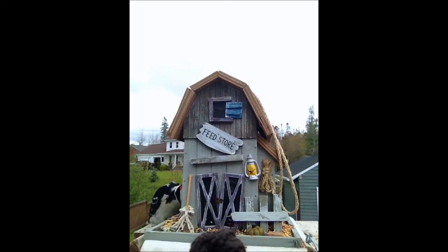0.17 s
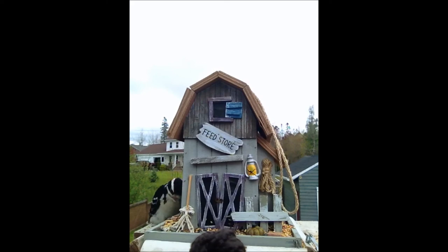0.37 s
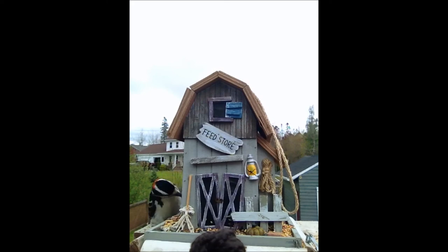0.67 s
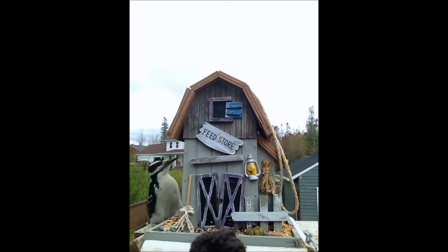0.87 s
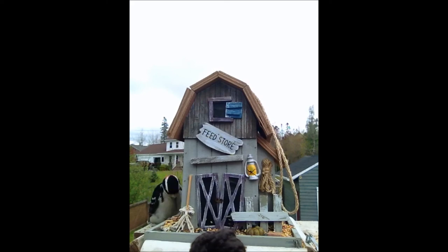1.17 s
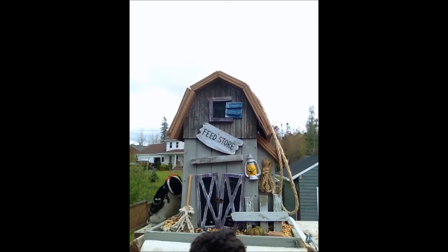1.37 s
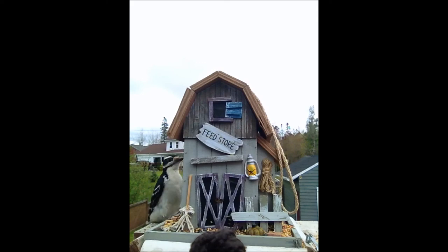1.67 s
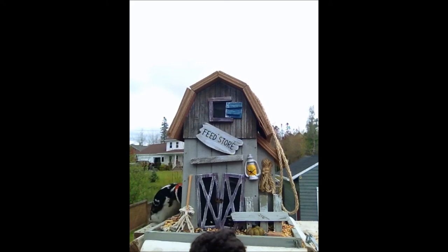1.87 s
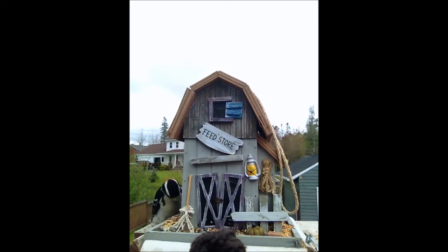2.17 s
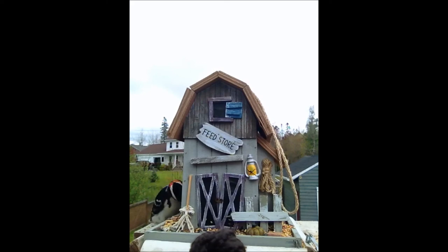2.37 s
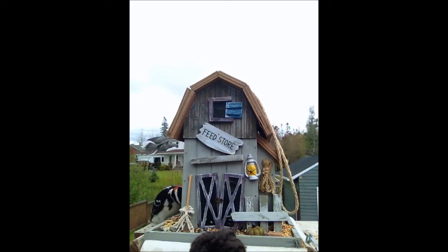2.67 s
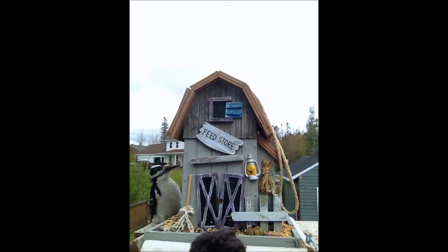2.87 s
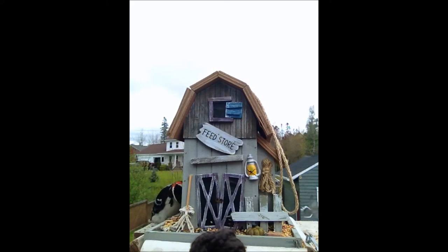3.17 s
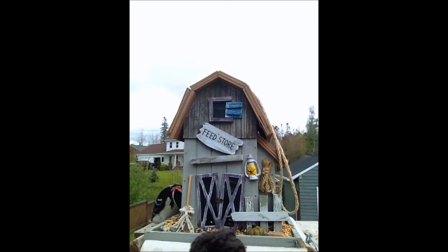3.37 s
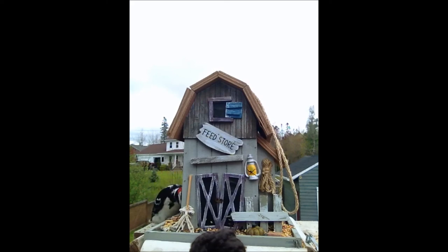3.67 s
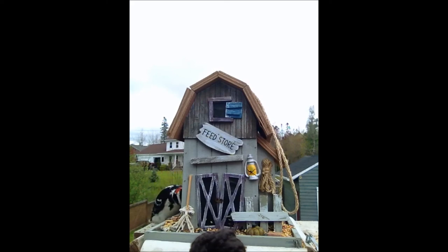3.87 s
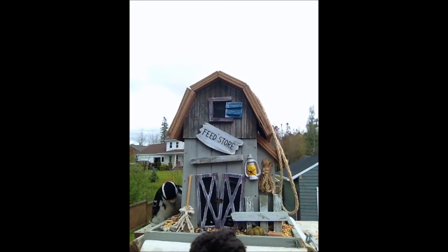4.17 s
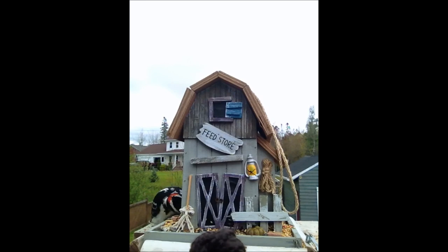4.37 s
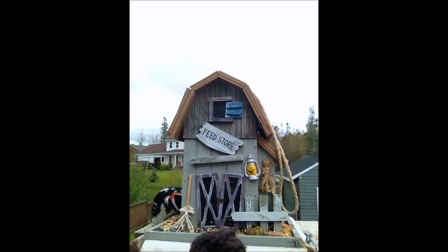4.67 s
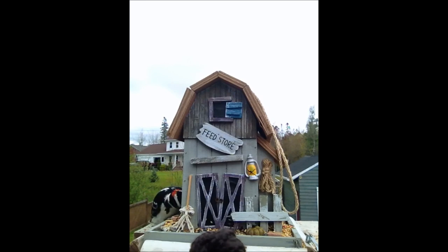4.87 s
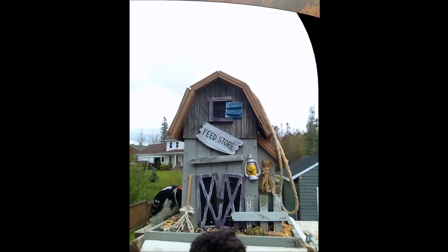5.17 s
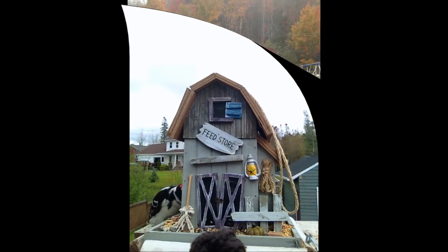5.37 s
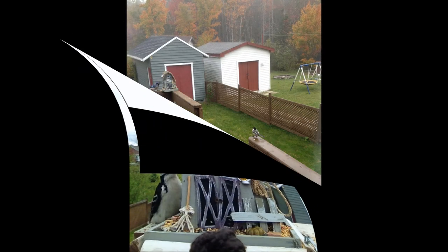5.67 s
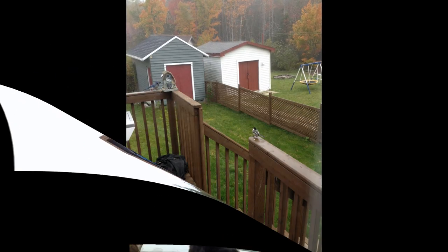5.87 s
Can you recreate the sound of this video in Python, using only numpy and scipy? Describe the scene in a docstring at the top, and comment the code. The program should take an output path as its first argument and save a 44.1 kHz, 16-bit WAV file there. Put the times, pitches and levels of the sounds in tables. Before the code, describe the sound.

Rapid whistling wingbeats recede across a backyard, followed by a few close, sharp pecks on wood and small seed cracks.

```python
"""A dove takes off from a backyard feeder and recedes, at about twelve wingbeats a second at first.
Its flight feathers flutter and whistle on the downstrokes, air swishes through them, and the wings
clap on some upstrokes. Close by, a woodpecker strikes the wooden feeder, ringing its boards, and
cracks seeds. Both birds echo off a house wall. Behind them: a wash of far traffic, open-air hiss,
the drone of a distant engine and one soft low bump."""
import sys
import numpy as np
from scipy import signal
from scipy.fft import rfft, irfft, next_fast_len
from scipy.io import wavfile

SR = 44100
rng = np.random.default_rng(int(sys.argv[2]) if len(sys.argv) > 2 else 0)


def materialize(psi):
    """Save the field psi as 16-bit PCM at rate SR to the path in sys.argv[1].

    A 1-D psi becomes a single channel; in a 2-D psi each row is a channel.
    """
    bounded = np.clip(np.atleast_2d(psi).T, -1, 1)
    quanta = np.round(bounded * 32767).astype(np.int16)
    wavfile.write(sys.argv[1], SR, quanta)


N = 266319

# Downstrokes: (time [s], length [s], level [dB], top pitch [Hz], pitch fall [share], fade [dB])
WINGBEATS = [ (.694, 0.013, -34.5, 2150, .1, 22), (.788, 0.024, -33, 2130, 0.16, 11),
             (0.875, 0.0236, -36, 2143, 0.11, -2), (0.952, 0.0251, -31.5, 2384, .09, -2),
             (1.024, 0.027, -31.5, 2297, 0.14, 1.5), (1.107, 0.036, -32.5, 2136, 0.14, 9),
             (1.253, 0.026, -48.5, 1970, 0.11, 2.5), (1.351, 0.033, -44.5, 2144, 0.19, 2),
             (1.477, 0.023, -34.5, 2192, 0.12, 5.5), (1.691, 0.025, -46.5, 2105, 0.15, -3.5),
             (1.804, .016, -39, 2056, 0.11, 1.5), (1.888, .036, -34.5, 2234, 0.13, 9),
             (1.984, 0.028, -39, 2103, 0.14, 2), (2.081, .038, -39, 2127, 0.11, 11),
             (2.18, 0.027, -39, 2000, .03, 9.5), (2.313, 0.009, -54.5, 1950, .03, -5),
             (2.427, 0.03, -45, 2226, 0.31, -5), (2.508, .036, -38, 2223, 0.127, 5.5),
             (2.621, 0.018, -44.5, 1920, .04, 12), (2.85, 0.017, -48.5, 1940, .04, 5),
             (3.063, 0.011, -56, 1940, .05, -2), (3.702, 0.013, -54, 1880, .06, 4),
             (4.205, .014, -56.5, 2010, 0.074, -8.5), (4.298, 0.02, -57, 1960, .02, -3),
             (4.425, .012, -55, 1900, .03, 1), (4.535, .028, -50, 2285, .05, 4)]
# Laboured take-off, then easy flight with spurts: (time [s], effort [0-1])
WING_EFFORT = [(.7, 0.92), (.8, 0.4), (.95, 0.4), (1.03, 0.34), (1.12, 0.2), (1.5, 0), (2.45, 0.42), (3, 0),
               (4.4, 0), (4.55, 0.4)]
# Air through feathers: (frequency [Hz], level [dB])
SWISH_SPECTRUM = [(150, -25), (700, -3.5), (1400, -21.5), (2400, -3.5), (3000, -19), (5200, -1),
                  (6500, -13.5), (7800, -24.5), (13000, -18), (16000, -27)]
def dove():
    """Each wingbeat pushes air, whistles and rustles; effort makes it rougher and airier."""
    push_spread_s, rustle_spread_s = 0.01, 0.11
    whistles, swishes = np.zeros(N), []
    for s, length_s, db, top_hz, fall, fade_db in WINGBEATS:
        effort = np.interp(s, *np.transpose(WING_EFFORT))
        add(whistles, s, feather_whistle(length_s, db, top_hz, fall, fade_db, rough=0.17 + 0.42 * effort))
        swishes.append((s, db - 24.5 + 10 * effort, push_spread_s))
        swishes.append((s, db - 32.5, rustle_spread_s))
    return whistles + puffs(swishes, SWISH_SPECTRUM) * gain_of(3.9 * wander(130))


# How loud the whistle's harmonics sound at each frequency: (frequency [Hz], level [dB])
WHISTLE_HARMONIC_LEVELS = [(1900, 2), (2300, 0), (3800, -2), (4500, 0.5), (5900, -3.5), (6500, -8.5),
                           (7200, -15), (7800, -35), (8600, -15), (9700, -31), (11000, -18), (15500, -45)]
def feather_whistle(length_s, db, top_hz, fall, fade_db, rough, size=3000):
    """A flight feather flutters during the downstroke; its pitch arches with wing speed."""
    top_at, climb_share = 0.298, 0.1235
    t = np.arange(size) / SR
    stroke = np.minimum(t / length_s, 1)
    climb = climb_share * np.clip(1 - stroke / top_at, 0, 1) ** 2
    sag = fall * np.clip((stroke - top_at) / (1 - top_at), 0, 1) ** 2
    hz = top_hz * (1 - climb - sag)
    jitter = 0.085 * rough * wander(420, size)
    turns = np.cumsum(hz * (1 + jitter)) / SR
    throb = gain_of(12 * rough * np.tanh(wander(230, size)))  # the feather catches and slips
    tone = np.zeros(size)
    for k in range(1, 8):
        harmonic_db = read(WHISTLE_HARMONIC_LEVELS, k * hz) + 5.1 * rough * wander(530, size)
        tone += gain_of(harmonic_db) * np.sin(2 * np.pi * (k * turns + rng.random()))
    gate = np.clip(t / 0.0048, 0, 1) * np.clip((length_s - t) / 0.00082, 0, 1)
    wake = np.clip(t / 0.0014, 0, 1) * np.exp(-np.maximum(t - length_s, 0) / 0.016)  # outlasts the tone
    turbulence = (0.099 + 0.38 * rough) * wake * noise(SWISH_SPECTRUM, size)
    return gain_of(db - fade_db * stroke) * (gate * evened(throb * tone) + turbulence)


# Wing contacts: (time [s], level [dB], spread [s])
WING_CLAPS = [(.842, -43, 0.0041), (.9415, -53, 0.0013), (1.0138, -23, 0.00056), (1.0955, -34.5, 0.001),
              (1.176, -48.5, .0008), (1.46, -48, 0.0021), (1.59, -55.5, 0.013), (1.97, -37.5, 0.00091),
              (2.497, -48, .0014)]
# Wing contact: (frequency [Hz], level [dB])
CLAP_SPECTRUM = [(150, -45), (700, -8), (1600, -7), (3000, -17.5), (5200, 3), (6800, -15.5), (8000, -28),
                 (11000, -17.5), (16000, -26)]
# First flap: (frequency [Hz], level [dB])
LAUNCH_SPECTRUM = [(200, -19), (900, 5), (1450, 11), (2200, -2), (3200, 5), (5200, 3.5), (7500, -13),
                   (16000, -24)]
def wing_claps(launch_s=0.639, launch_db=-40.5, launch_spread_s=0.0057):
    """The wings meet or brush on some upstrokes, after a duller first flap."""
    claps = puffs(WING_CLAPS, CLAP_SPECTRUM)
    return claps + puffs([(launch_s, launch_db, launch_spread_s)], LAUNCH_SPECTRUM)


# Beak blows: (time [s], crack [dB], resonance [Hz], rebound re crack [dB], feeder shake [dB])
BEAK_BLOWS = [(2.3871, -18.5, 4600, -33, -71), (2.514, -17.5, 4530, -15, -57),
              (2.7047, -16.5, 3590, -12.5, -32), (3.1714, -22, 3630, -43, -64),
              (3.3861, -20, 4150, -6, -37.5), (5.0125, -40.5, 2950, -16, -59), (5.088, -50, 1300, -12, -71),
              (5.1145, -42, 3970, -28, -70)]
# Low modes of the whole feeder: (frequency [Hz], level [dB], t60 [s])
FEEDER_MODES = [(157.6, -14, 0.42), (219, -2, 0.068), (262, -19, 0.53), (312, -3, 0.063), (670, 9, 0.02),
                (980, 1, 0.06)]
def woodpecker(rebound_s=0.004, boards_db=-21.5):
    """The beak lands, then lands again as the feeder gives and shakes."""
    pecks = np.zeros(N)
    for s, crack_db, hz, rebound_db, shake_db in BEAK_BLOWS:
        add(pecks, s, beak_contact(crack_db, hz, boards_db))
        rebound = beak_contact(crack_db + rebound_db, hz, boards_db + 6)
        add(pecks, s + rebound_s, rebound + gain_of(shake_db) * ring(FEEDER_MODES))
    return pecks


# Beak on wood: (frequency [Hz], level [dB])
CRACK_SPECTRUM = [(100, -65), (500, -53), (1000, 1.5), (2200, -11), (2900, -7.5), (3500, 2), (4200, -7),
                  (5000, 4.5), (5900, -2), (7000, -17), (7800, -37), (8700, -31), (9800, -39), (11300, -28),
                  (16000, -49)]
# Modes of the boards: (frequency [Hz], level [dB], t60 [s])
BOARD_MODES = [(640, -41, 0.022), (797, -9.5, 0.054), (1070, 0, 0.027), (1322, -1, 0.03),
               (1452, 2.5, 0.013), (1783, 1, 0.021), (1834, -25, 0.12), (2620, -6.5, 0.024),
               (3590, 0.5, 0.0083), (5460, -17, 0.013)]
def beak_contact(crack_db, hz, ring_db):
    """A crack over ringing boards; the ring grows less than the crack, so hard blows are brighter."""
    sound = gain_of(ring_db + 0.47 * crack_db) * ring(BOARD_MODES)
    add(sound, 0, gain_of(crack_db) * snap(CRACK_SPECTRUM, hz, lift_db=8.5, t60_s=0.015, scatter=0.9))
    return sound


# Seed snaps: (time [s], level [dB], resonance [Hz])
SEED_SNAPS = [(3.767, -49, 4500), (3.808, -48, 6100), (3.9768, -29.5, 3940), (3.993, -48, 11000),
              (4.781, -50, 12000), (4.8793, -47.5, 5700), (4.954, -48.5, 7260), (5.3428, -41.5, 2650)]
# Seed husk: (frequency [Hz], level [dB])
HUSK_SPECTRUM = [(100, -39), (800, -8), (2000, -2.5), (4000, 7.5), (5600, 6.5), (7500, -8), (12000, -10.5),
                 (16000, -13)]
def seeds():
    """The beak cracks and nudges seeds."""
    snaps = np.zeros(N)
    for s, db, hz in SEED_SNAPS:
        add(snaps, s, gain_of(db) * snap(HUSK_SPECTRUM, hz, lift_db=11.5, t60_s=0.0042, scatter=1.0))
    return snaps


# Far traffic: (frequency [Hz], density [dB])
TRAFFIC_SPECTRUM = [(18, -76), (30, -32), (76, -32), (96, -14.5), (162, 0), (225, -2), (276, 1.5),
                    (303, -3.5), (339, -1.5), (379, -5), (548, -2), (809, -1), (1070, -0.5), (1550, -5),
                    (2500, -15.5), (3250, -29.5), (5500, -120)]
# Open-air hiss: (frequency [Hz], density [dB])
HISS_SPECTRUM = [(1500, -0.5), (2300, -7), (3000, 1), (4000, -3.5), (5300, 1), (6200, -11), (7200, -24.5),
                 (9000, -23.5), (16000, -24.5)]
# Slow background swell: (time [s], level [dB])
AIR_SWELL = [(0, -0.9), (.5, -0.16), (.75, 0.3), (2.2, .1), (2.8, 1), (3.5, -.5), (4.1, -0.77), (4.9, 0.34),
             (6.04, .5)]
def open_air():
    """A low wash of far traffic and a thin hiss swell together, the hiss more deeply."""
    swell_db, = follow(AIR_SWELL)
    traffic = noise(TRAFFIC_SPECTRUM) * gain_of(-50 + swell_db + 1.2 * wander(2.5))
    hiss = noise(HISS_SPECTRUM) * gain_of(-62.5 + 3.9 * swell_db + 0.89 * wander(37))
    return traffic + hiss


# Engine run: (time [s], cycle rate [Hz], level [dB])
ENGINE_RUN = [(0, 25.8, -66.5), (.65, 28.36, -59), (1.55, 28.8, -63), (1.85, 31.03, -58.5),
              (2.5, 31.3, -63), (2.8, 28.3, -63.5), (3.1, 26.18, -75), (4.0, 27.78, -77),
              (4.8, 28.4, -67.5), (6.04, 27.4, -65)]
# Exhaust resonances: (frequency [Hz], gain [dB])
EXHAUST_RESPONSE = [(75, -9), (86, -15), (92, -3), (103, -10.5), (115, -1), (124, -9), (192, -2.5),
                    (200, 2.5), (215, -6.5)]
def engine():
    """Three wavering orders of a far engine, each louder when it meets an exhaust resonance."""
    cycle_hz, db = follow(ENGINE_RUN)
    turns = np.cumsum(cycle_hz * (1 + 0.0053 * wander(45))) / SR
    drone = np.zeros(N)
    for order in (3, 4, 7):
        order_db = db + read(EXHAUST_RESPONSE, order * cycle_hz) + 0.41 * order * wander(23)
        drone += np.sqrt(2) * gain_of(order_db) * np.sin(2 * np.pi * order * turns)
    return drone


# Low bump: (frequency [Hz], level [dB])
BUMP_SPECTRUM = [(50, -38), (85, 0), (125, -3), (165, 0), (220, -4), (500, -48), (1500, -80)]
def bump(time_s=0.3, db=-48.5, spread_s=0.024):
    """One soft puff of low noise."""
    return puffs([(time_s, db, spread_s)], BUMP_SPECTRUM)


# Microphone self-noise: (frequency [Hz], density [dB])
MIC_SPECTRUM = [(3000, 8), (7500, -2), (9500, -8.5), (12000, -4), (14500, 0), (16000, -9)]
def microphone_hiss():
    """The microphone's own steady noise."""
    return gain_of(-68) * noise(MIC_SPECTRUM)


def yard(sound, wall_db, tail_db, t60_s, wall_s=0.024, size=22000):
    """The house wall returns one echo; deck and fences scatter a short tail."""
    t = np.arange(size) / SR
    tail = rng.standard_normal(size) * gain_of(-60 * t / t60_s) * np.clip(t / 0.01, 0, 1)
    echoes = gain_of(tail_db) * tail / np.linalg.norm(tail)
    add(echoes, wall_s, gain_of([wall_db]))
    return sound + signal.fftconvolve(sound, echoes)[:N]


def ring(modes, size=12000):
    """Decaying modes; each spot struck rings a little differently."""
    t = np.arange(size) / SR
    detunings = 1 + rng.uniform(-0.012, 0.012, len(modes))
    sound = sum(gain_of(db - 60 * t / t60_s) * np.sin(2 * np.pi * (hz * detune * t + rng.random()))
                for (hz, db, t60_s), detune in zip(modes, detunings))
    lowest_hz = modes[0][0]
    return sound * (1 - np.exp(-t * lowest_hz / 0.45))  # builds in about half a cycle


def snap(spectrum, resonance_hz, lift_db, t60_s, scatter, size=2048):
    """An impulse and its decaying scatter through one resonance; energy of 1 ms at rms 1."""
    t, hz = np.arange(size) / SR, abs(np.fft.fftfreq(size, 1 / SR))
    resonance_db = lift_db / (1 + ((hz / resonance_hz - 1) / 0.071) ** 2)
    log_gain = np.log(gain_of(read(spectrum, hz) + resonance_db))
    response = np.fft.ifft(np.exp(np.conj(signal.hilbert(log_gain)))).real  # minimum phase
    impulse = evened(1.0 * (t == 0))
    force = impulse + scatter * evened(rng.standard_normal(size) * gain_of(-60 * t / t60_s))
    return evened(signal.fftconvolve(force, response)[:size]) * np.sqrt(SR / 1000 / size)


def puffs(rows, spectrum):
    """Noise under one Gaussian swell per row."""
    envelope = np.zeros(N)
    for s, db, spread_s in rows:
        reach_s = 4 * spread_s
        t = np.arange(-reach_s, reach_s, 1 / SR)
        add(envelope, s - reach_s, gain_of(db) * np.exp(-0.5 * (t / spread_s) ** 2))
    return noise(spectrum) * envelope


def noise(spectrum, size=N):
    """Shaped noise, rms 1."""
    n = next_fast_len(size)
    gain = gain_of(read(spectrum, np.fft.rfftfreq(n, 1 / SR)))
    return evened(irfft(rfft(rng.standard_normal(n)) * gain, n)[:size])


def wander(rate_hz, size=N):
    """Random drift low-passed at rate_hz, rms 1."""
    n = next_fast_len(size)
    lowpass = 1 / (1 + (np.fft.rfftfreq(n, 1 / SR) / rate_hz) ** 4)
    return evened(irfft(rfft(rng.standard_normal(n)) * lowpass, n)[:size])


def follow(curve):
    """Each column of a control curve, per sample."""
    s, *columns = np.transpose(curve)
    return [np.interp(np.arange(N) / SR, s, column) for column in columns]


def read(spectrum, hz):
    """Level in dB, interpolated over log frequency."""
    points_hz, db = np.transpose(spectrum)
    return np.interp(np.log(hz + 1), np.log(points_hz + 1), db)


def add(mix, s, sound):
    """Mixes a sound in at time s."""
    part = mix[max(round(s * SR), 0):][:len(sound)]
    part += sound[:len(part)]


def gain_of(db):
    """Decibels to amplitude."""
    return 10 ** (np.asarray(db) / 20)


def evened(x):
    """Scales to rms 1."""
    return x / np.sqrt(np.mean(x ** 2) + 1e-20)


def scene():
    """The dove is out in the yard; the woodpecker is close and nearly dry."""
    wings = yard(dove() + wing_claps(), wall_db=-15, tail_db=-11.5, t60_s=0.098)
    pecks = yard(woodpecker() + seeds(), wall_db=-33, tail_db=-20, t60_s=0.16)
    return (wings + pecks + open_air() + microphone_hiss() + engine() + bump())[None]


def record(dry):
    """Low cut and band limit."""
    low_cut_hz, edge_hz = 55, 15550
    low_cut = signal.butter(2, low_cut_hz, "highpass", fs=SR, output="sos")
    band_limit = signal.firwin(511, edge_hz, window=("kaiser", 9), fs=SR)
    return signal.oaconvolve(signal.sosfilt(low_cut, dry), band_limit[None], "same")


dry = scene()
out = record(dry)
materialize(out)
```